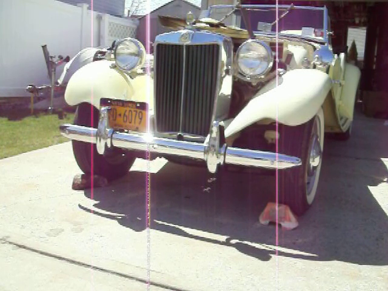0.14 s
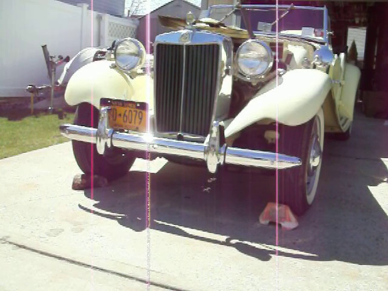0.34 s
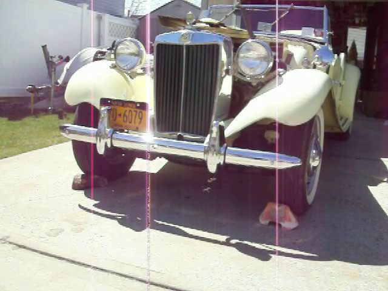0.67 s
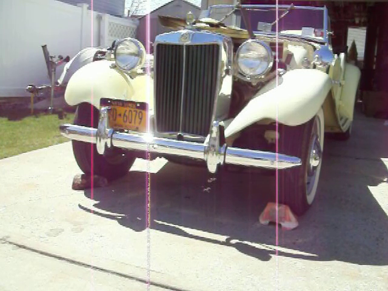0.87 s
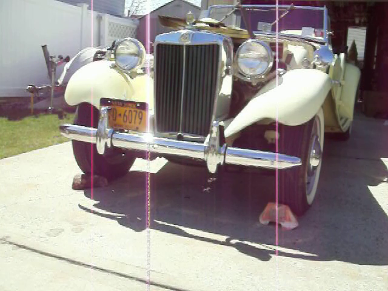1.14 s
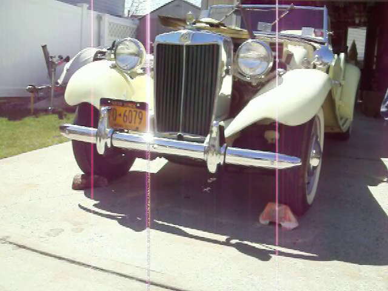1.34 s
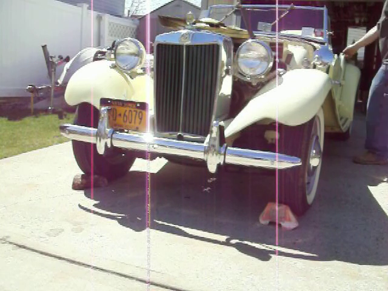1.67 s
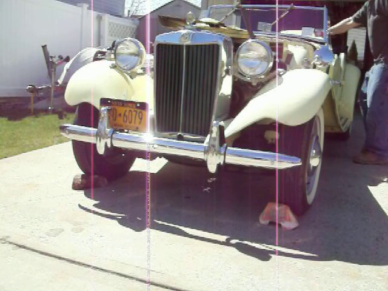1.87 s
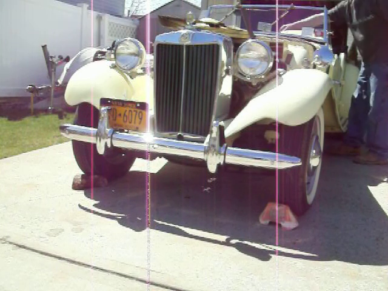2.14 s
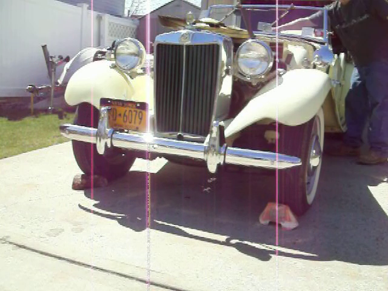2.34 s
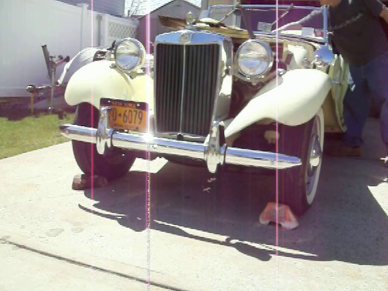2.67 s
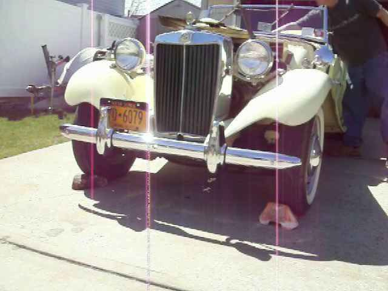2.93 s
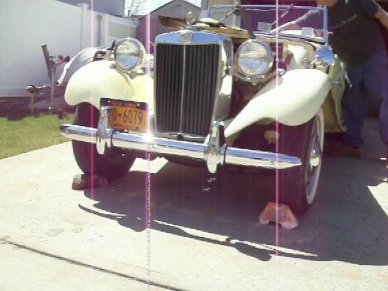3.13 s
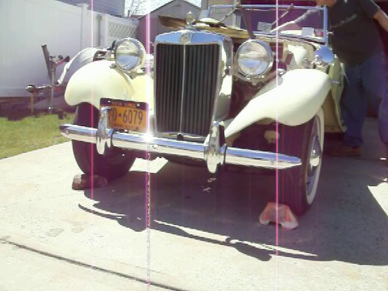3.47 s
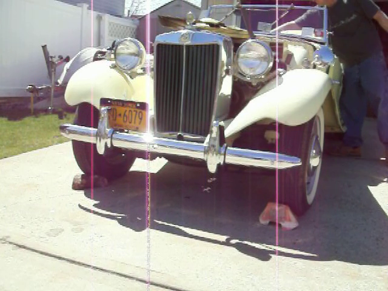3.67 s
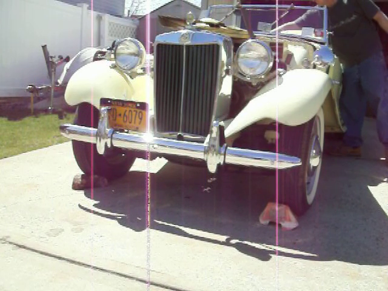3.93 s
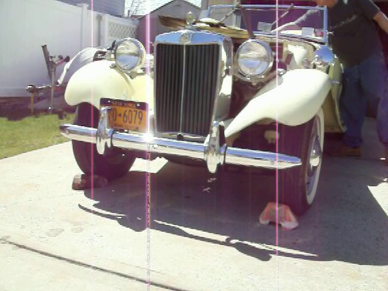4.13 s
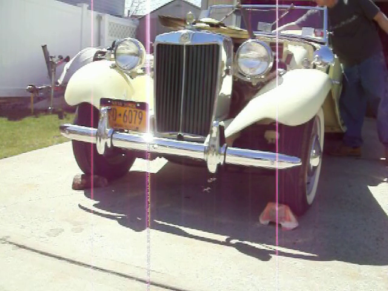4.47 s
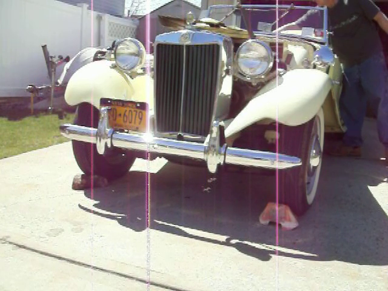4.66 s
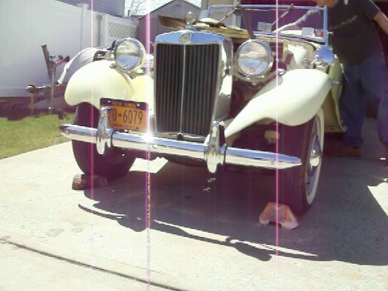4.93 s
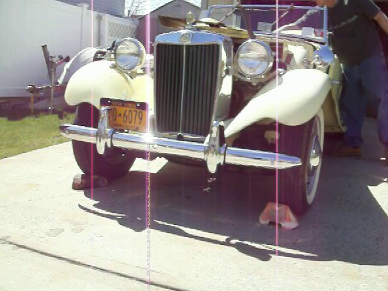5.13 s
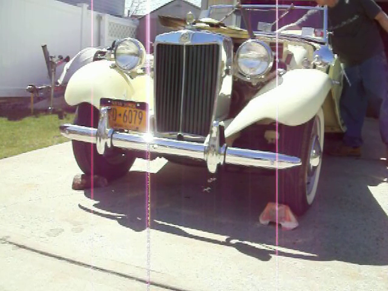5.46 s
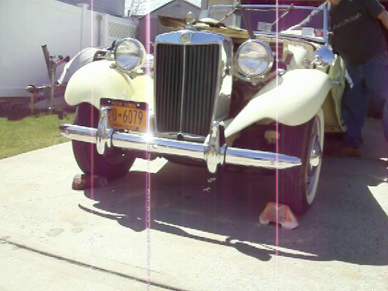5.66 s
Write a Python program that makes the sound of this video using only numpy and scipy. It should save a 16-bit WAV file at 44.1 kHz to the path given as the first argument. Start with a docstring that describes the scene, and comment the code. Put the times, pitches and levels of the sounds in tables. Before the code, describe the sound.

An old car engine idles with a rattly throb, then shuts off and shudders to rest as wind buffets the microphone.

```python
"""On a garden driveway, an old four-cylinder roadster idles, is switched off and runs down to rest.
The engine is a periodic source driving resonators: firings thud in the exhaust, tappets and timing
chain clatter under the cover, the block hums and knocks, and the slowing engine shakes the body.
Turbulent wind buffets a small camera's microphone and far birds whistle. One sharp click is heard
during the idle, and a soft swish after the engine stops."""
import sys
import numpy as np
from scipy import signal
from scipy.fft import rfft, irfft
from scipy.io import wavfile
from scipy.ndimage import uniform_filter1d

SR = 44100
rng = np.random.default_rng(int(sys.argv[2]) if len(sys.argv) > 2 else 0)


def int16_out(signal):
    """Quantize to a 16-bit WAV file."""
    q = np.round(np.clip(np.atleast_2d(signal).T, -1, 1) * 32767)
    wavfile.write(sys.argv[1], SR, q.astype(np.int16))


N = 255780
TIME = np.arange(N) / SR
IDLE_HZ = 41.2  # firing rate; a beat is one firing interval, four beats are one camshaft turn


def amp(db):
    """Amplitude ratio of a level in decibels."""
    return 10 ** (np.asarray(db) / 20)


def unit(x):
    """Normalisation to rms 1."""
    return x / np.sqrt(np.mean(x ** 2))


def idle_unit(x):
    """Normalisation to rms 1 over the first two seconds, while the engine idles."""
    return x / np.sqrt(np.mean(x[:2 * SR] ** 2))


def curve(rows):
    """Linear interpolation of (time_s, value) rows."""
    return np.interp(TIME, *np.transpose(rows))


def bell(x, middle, half_width):
    """Gaussian hump of height 1."""
    return np.exp(-((x - middle) / half_width) ** 2)


def noise():
    """Gaussian white noise."""
    return rng.standard_normal(N)


def walk(rate_hz):
    """Smooth random modulation of rms 1."""
    size = int(SR / rate_hz)
    steps = np.repeat(rng.standard_normal(N // size + 1), size)
    return unit(uniform_filter1d(steps, size)[:N])


def excite(x, response):
    """Convolution: a linear body answers each blow with its impulse response."""
    return signal.oaconvolve(x, response)[:N]


def colour(x, outline, size=16384):
    """Minimum-phase filter with a (frequency_hz, gain_db) outline, made by folding the cepstrum."""
    hz, db = np.transpose(outline)
    bins_hz = np.arange(size // 2 + 1) * SR / size
    gain_db = np.interp(np.log(bins_hz + 1), np.log(hz), db)
    cepstrum = irfft(np.log(amp(gain_db)))
    cepstrum[1:size // 2] *= 2
    cepstrum[size // 2 + 1:] = 0
    return excite(x, irfft(np.exp(rfft(cepstrum))))


def cut(x, hz, kind, order=2):
    """Maximally flat high-pass or low-pass filter."""
    return signal.sosfilt(signal.butter(order, hz, kind, fs=SR, output="sos"), x)


def burst(t60_s):
    """Dense modes merge into exponentially decaying noise, here of energy 1."""
    t = TIME[:SR // 5]
    tail = rng.standard_normal(len(t)) * np.exp(-np.log(1000) * t / t60_s)
    return tail / np.sqrt(np.sum(tail ** 2))


def ring(modes):
    """Free vibration: a sum of damped (pitch_hz, t60_s, level_db) modes."""
    t = TIME[:SR // 5]
    return sum(amp(db) * np.sin(2 * np.pi * hz * t) * np.exp(-np.log(1000) * t / t60_s)
               for hz, t60_s, db in modes)


def strikes(beats, place, scatter_db, jitter_beats):
    """Quasi-periodic impulses: one blow per camshaft turn, `place` beats into it."""
    turns = np.arange(0, beats[-1], 4)
    chance = rng.standard_normal((len(turns), 2))
    samples = np.searchsorted(beats, turns + place + jitter_beats * chance[:, 0])
    return np.bincount(samples, amp(scatter_db * chance[:, 1]), N + 1)[:N]


def placed(sound, start_s, peak_db):
    """A transient, delayed and scaled to a peak level."""
    shape = sound / np.abs(sound).max()
    return amp(peak_db) * np.interp(TIME - start_s, TIME[:len(sound)], shape, left=0, right=0)


# spectrum of the outdoor background: frequency_hz, gain_db
GARDEN_SPECTRUM = [(150, -39), (250, -4), (463, -7), (965, -4), (1110, -6.5), (1210, -9), (1610, -12),
                   (2420, -14.5), (2860, -14.5), (4590, -15.5), (5740, -29.5), (7460, -57), (12600, -120)]


def garden():
    """Ambient noise: a distant broadband wash whose level drifts slowly."""
    return unit(colour(noise(), GARDEN_SPECTRUM)) * amp(-43 + 2.3 * walk(2.524))


# pitch glides, by song name: length_s, start_hz, end_hz
BIRD_SONGS = {"up": (.135, 1712, 2100), "down": (0.11, 2112, 1400), "chip": (.042, 5060, 4180)}
# calls of far birds: start_s, song, level_db
BIRD_CALLS = [(3.714, "up", -49), (4.045, "up", -51), (4.235, "chip", -45.5), (4.41, "up", -50),
              (4.6, "chip", -44.5), (4.755, "down", -56), (5.115, "down", -61), (5.479, "down", -59)]


def birds():
    """Frequency sweeps: one bird slurs up or down, another chips; reflection off houses adds a tail."""
    calls = np.zeros(N)
    for start_s, song, db in BIRD_CALLS:
        length_s, start_hz, end_hz = BIRD_SONGS[song]
        progress = np.clip((TIME - start_s) / length_s, 0, 1)
        pitch_hz = start_hz + (end_hz - start_hz) * progress
        envelope = np.sqrt(2 * np.abs(np.sin(np.pi * progress)))
        calls += amp(db) * envelope * np.sin(2 * np.pi * np.cumsum(pitch_hz) / SR)
    return calls + amp(-6.5) * excite(calls, burst(t60_s=0.3))


def swish(middle_s=4.93, length_s=0.24):
    """Amplitude modulation: mid-range noise swells softly once, after the engine stops."""
    spectrum = [(120, -20), (400, 9.5), (750, 5), (1100, -7), (2200, -27), (5000, -38)]
    return amp(-41) * unit(colour(noise(), spectrum)) * bell(TIME, middle_s, length_s / 2)


def click(time_s=2.5481):
    """A brief pulse has a broad spectrum: two close spikes make one very bright click."""
    ms = (TIME - time_s) * 1000
    spikes = sum(np.exp(-np.abs(ms - lag_ms) / 0.05) for lag_ms in (0, 0.37))
    return 0.85 * bell(ms, 0.11, 0.65) - 2.1 * cut(spikes, 7700, "lowpass", order=1)


def eddy(seconds, half_width_ms):
    """A vortex has a low-pressure core: a dip at the microphone, with a gentle rise on either side."""
    u = seconds * 1000 / half_width_ms
    return 0.6 / (1 + (u / 2.5) ** 2) - 1.5 / (1 + u ** 2)


# spectrum of the wind's rumble: frequency_hz, gain_db
RUMBLE_SPECTRUM = [(12, -13), (24, 5), (45, -3.5), (70, -2.5), (110, -7), (180, -14), (300, -33),
                   (800, -74.5)]
# a breeze that wavers, then dies away: time_s, rumble_db
BREEZE_LEVELS = [(0, -18.5), (1.0, -18), (1.8, -22), (2.7, -17.5), (3.7, -25.5), (4.6, -25.5), (5.25, -28),
                 (5.8, -32)]
# gusts on top of it: middle_s, length_s, rumble_db, rustle_db
WIND_GUSTS = [(2.071, 0.15, -14.5, -32.5), (2.307, 0.23, -11, -23), (2.463, 0.029, -34, -25.5),
              (2.559, 0.052, -9.5, -45), (3.026, 0.18, -15.5, -53.5), (4.065, 0.2, -21, -48),
              (4.347, 0.23, -19.5, -34.5), (4.784, 0.11, -23, -40), (5.044, 0.14, -28, -50),
              (5.37, .08, -28, -52), (5.577, 0.18, -27.5, -60)]


def wind(full_wind_db=-23, calm_hz=70.6, eddies_per_s=35):
    """Turbulent pressure rumbles; gusts swell it, rustle, shed eddies and pull on the diaphragm."""
    gust = sum(amp(db) * bell(TIME, s, length / 2) for s, length, db, _ in WIND_GUSTS)
    rustling = sum(amp(db) * bell(TIME, s, length / 2) for s, length, _, db in WIND_GUSTS)
    strength = np.hypot(amp(curve(BREEZE_LEVELS)), gust)
    full, calm = (unit(colour(noise() * amp(1.3 * walk(30)), RUMBLE_SPECTRUM)) for _ in range(2))
    share = np.minimum(strength / amp(full_wind_db), 1)  # weak wind keeps only its deepest rumble
    rumble = strength * (share * full + np.sqrt(1 - share ** 2) * cut(calm, calm_hz, "lowpass"))
    rustle_spectrum = [(90, -18.5), (250, 3.5), (500, 4), (950, -13), (1600, -25.5), (4000, -49.5)]
    rustle = unit(colour(noise() * amp(3.2 * walk(70)), rustle_spectrum))
    shedding = (rng.random(N) < eddies_per_s / SR) * amp(-1.5 + 1.5 * noise()) * gust
    small_eddy = eddy(np.arange(-SR // 20, SR // 20) / SR, half_width_ms=1.3)
    eddies = signal.oaconvolve(shedding, small_eddy, "same")
    suction = amp(18.5) * gust ** 2
    return rumble + rustle * rustling + eddies - suction


# big eddies: middle_s, level_db, half_width_ms
BIG_EDDIES = [(1.116, -7, 1.6), (2.024, -9.5, 0.44), (2.225, 3.5, 1.27), (2.284, 4.5, 0.62), (2.317, 7, .9),
              (2.347, -0.5, 0.65), (2.387, 6, 1.5), (2.464, 4.5, 1), (2.509, 6, 2.1), (2.872, -5, 0.73),
              (4.001, -6.5, 1.7), (4.046, -6.5, 1.75), (4.322, -5, 1.6), (4.358, -6, 4.3), (4.768, -9, 2.9),
              (4.804, -5, 1.2), (4.823, -7.5, 1.4), (5.016, -11, 2.6), (5.156, -13, 2), (5.408, -10, 2.6)]


def wind_thumps():
    """Pressure pulses: single big vortices thump the microphone as they pass."""
    return sum(amp(db) * eddy(TIME - s, ms) for s, db, ms in BIG_EDDIES)


# tones of block and dynamo: firing_multiple, level_db
SHAFT_ORDERS = [(4.25, -27), (5.5, -40.5), (7.5, -45), (8, -37.5), (9.5, -44), (10, -46), (12.5, -45.5),
                (14.85, -49), (15, -43), (16, -57), (20, -52.5)]


def hum(beats, pace):
    """Rotational orders: wavering tones follow the shaft speed and fade quickly as it falls."""
    angle = beats + 0.0079 * walk(12)
    tones = sum(amp(db + 2.7 * walk(9)) * np.sin(2 * np.pi * (k * angle + rng.random()))
                for k, db in SHAFT_ORDERS)
    return np.sqrt(2) * tones * np.minimum(pace, 1) ** 6


# response of the engine block: frequency_hz, gain_db
BLOCK_RESPONSE = [(150, -6.5), (260, -10), (450, -1), (560, -1), (720, 3), (880, -1.5), (1050, 0),
                  (1170, -5.5), (1400, -6), (1700, -10.5), (3000, -44)]


def block(beats, pace):
    """Impact and friction: pistons knock at each stroke's end; bearings and belt rub on as they slow."""
    slaps = sum(excite(strikes(beats, k / 2, scatter_db=4.5, jitter_beats=0.004), burst(t60_s=0.05))
                for k in range(8))
    knocks = amp(-5) * idle_unit(colour(slaps, BLOCK_RESPONSE))
    rub = amp(-1 - 2.5 * pace) * unit(colour(noise(), BLOCK_RESPONSE))
    return (knocks + rub) * amp(-31.5) * pace ** 0.61


# knocks as the crankshaft rocks to rest: start_s, peak_db
SLACK_KNOCKS = [(4.115, -26), (4.19, -22.5), (4.335, -24), (4.391, -23.5), (4.449, -25), (4.477, -30),
                (4.52, -24)]


def last_knocks():
    """Backlash: slack in the drive is taken up with dull knocks on the block."""
    return sum(placed(colour(burst(t60_s=0.16), BLOCK_RESPONSE), s, db) for s, db in SLACK_KNOCKS)


# tappet blows within one camshaft turn: place_beats, relative_db
TAPPET_BLOWS = [(.58, -6.5), (.8, 6), (0.982, -0.5), (1.8, 0.5), (1.972, -7), (2.62, 1.5), (2.8, -7),
                (3.022, -8.5), (3.7, 0), (3.86, -10)]
# response of the valve cover: frequency_hz, gain_db
COVER_RESPONSE = [(700, -18.5), (1300, -3.5), (1600, -12.5), (1980, -4.5), (2120, 0), (2750, 1), (3120, 0),
                  (3400, 4), (3750, -3), (4300, -1.5), (4750, -8), (5050, -5.5), (5500, -10), (6000, -35.5)]
# ringing parts of the valve gear: pitch_hz, t60_s, relative_db
GEAR_MODES = [(1307, 0.13, -3.5), (1788, 0.11, -6), (2553, 0.042, -3.5), (2650, 0.064, -1),
              (3010, 0.08, -3), (3150, 0.017, -5.5), (3477, 0.05, 0), (4790, 0.12, -7.5)]


def valve_gear(beats, pace):
    """Modal excitation: tappets strike under the cover; the chain's sizzle keeps the parts ringing."""
    blows = [amp(db) * strikes(beats, place, scatter_db=1.4, jitter_beats=0.007)
             for place, db in TAPPET_BLOWS]
    impacts = sum(excite(blow, burst(t60_s=0.034)) for blow in blows)
    clicks = idle_unit(colour(impacts, COVER_RESPONSE))
    rings = idle_unit(excite(sum(blows), ring(GEAR_MODES)))
    # the timing chain tightens before each firing
    tension_db = 1.4 * np.cos(2 * np.pi * (beats - 0.87)) + 1.7 * walk(150)
    chain = idle_unit(colour(noise() * amp(tension_db), COVER_RESPONSE))
    chain_ring = idle_unit(excite(noise(), ring(GEAR_MODES)))
    # slower cams set the valves down more gently, and the chain takes over
    tappets = (amp(-5.5) * clicks + amp(-9) * rings) * pace ** 0.3
    clatter = tappets + amp(-2.3 * pace) * chain + amp(-11.5) * chain_ring
    return clatter * amp(-28.5) * pace ** 0.98


# valve closings as the engine coasts: start_s, peak_db, favoured_hz
VALVE_CLINKS = [(3.679, -26, 1390), (3.775, -29, 3300), (3.882, -25.5, 1380), (4.169, -27, 1390),
                (4.41, -29.5, 3800), (4.468, -30, 3000), (4.548, -29.5, 3800), (4.625, -37, 3600),
                (4.693, -32.5, 3500)]


def clinks():
    """Selective excitation: each last valve snaps shut and favours the modes near one pitch."""
    out = np.zeros(N)
    for start_s, peak_db, favoured_hz in VALVE_CLINKS:
        modes = [(hz, t60_s / 2, db - 18 * abs(np.log2(hz / favoured_hz)))
                 for hz, t60_s, db in GEAR_MODES]
        out += placed(signal.fftconvolve(ring(modes), burst(t60_s=0.096)), start_s, peak_db)
    return out


# mode of a body panel: pitch_hz, t60_s, relative_db
PANEL_MODES = [(225.7, 0.6, 0)]


def car_body(puffs, beats, firing_hz, shake_at_hz=28.5, boom_at_hz=32.5):
    """Resonance: the body shakes and a panel booms as the firing rate falls through their ranges."""
    shake = np.sqrt(2) * (np.sin(4 * np.pi * beats) + amp(-4) * np.sin(2 * np.pi * beats))
    shake_gain = amp(-21) * bell(firing_hz, shake_at_hz, half_width=6)
    boom = unit(excite(puffs, ring(PANEL_MODES)))
    boom_gain = amp(-43) * firing_hz / IDLE_HZ + amp(-32) * bell(firing_hz, boom_at_hz, half_width=7)
    return shake * shake_gain + boom * boom_gain


# the four cylinders in firing order: relative_db, lateness_beats
CYLINDER_PULSES = [(-1.5, 0.014), (7, 0.016), (1.5, -0.015), (-6.5, 0.031)]


def cylinder_puffs(beats):
    """Pulse train: four unequal cylinders make a lopsided pattern that recurs each camshaft turn."""
    return sum(amp(db) * strikes(beats, k + late, scatter_db=1.4, jitter_beats=0.014)
               for k, (db, late) in enumerate(CYLINDER_PULSES))


# response of exhaust pipe and silencer: frequency_hz, gain_db
PIPE_RESPONSE = [(22, -20.5), (45, -5.5), (75, -7.5), (110, 7.5), (170, -2.5), (226, -2), (250, -5.5),
                 (330, -9), (420, -19), (800, -53.5)]
# steady swing of gas in the pipe: firing_multiple, relative_db
PIPE_HARMONICS = [(1, -10.5), (2, -7.5), (3, -2), (4, -8), (5, -12)]


def exhaust(puffs, beats, pace, key_off_s=2.89, burn_out_s=0.085, unfired_db=-5):
    """Forced oscillation: puffs drive the gas in the pipe, and weaken once the ignition is cut."""
    dispersion_rad = 1.2  # the pipe shifts each harmonic's phase by the square of its number
    throb = sum(amp(db + 1.3 * walk(14)) * np.cos(2 * np.pi * k * beats + dispersion_rad * k ** 2)
                for k, db in PIPE_HARMONICS)
    # without combustion the puffs lose their edge as the engine slows
    edge = amp(-13.5) * idle_unit(colour(puffs, PIPE_RESPONSE)) * pace ** 4
    unfired = np.clip((TIME - key_off_s) / burn_out_s, 0, 1)
    return (np.sqrt(2) * throb + edge) * amp(-17 + unfired_db * unfired) * pace ** 1.5


# engine speed, idling and then coasting to rest: time_s, firing_hz
FIRING_RATE = [(0, 40.6), (.5, 41.45), (1.25, 41.55), (2.0, 40.8), (2.97, 41.5), (3.1, 39.2), (3.3, 30.8),
               (3.7, 22.0), (4.35, 8.5), (4.58, 1.3), (4.75, 0)]


def scene():
    """Superposition: engine, wind and garden add at the microphone."""
    firing_hz = curve(FIRING_RATE)
    beats = np.cumsum(firing_hz) / SR
    pace = firing_hz / IDLE_HZ
    puffs = cylinder_puffs(beats)
    engine = exhaust(puffs, beats, pace) + car_body(puffs, beats, firing_hz)
    engine += hum(beats, pace) + valve_gear(beats, pace) + block(beats, pace)
    engine += clinks() + last_knocks()
    return (engine + wind() + wind_thumps() + swish() + garden() + birds())[None]


def gain_control(x, ceiling_db, window=882):
    """Limiting: whenever the short-term rms passes the ceiling, the whole sound ducks."""
    level = np.sqrt(uniform_filter1d(x ** 2, size=window) + 1e-9)
    gain = np.minimum(amp(ceiling_db) / level, 1)
    return x * uniform_filter1d(gain, size=window // 2)


def record(dry, band_hz=5900, top_hz=16500):
    """Saturation and band limiting: the camera ducks, rounds peaks and cuts treble; a click breaks in."""
    held = cut(gain_control(dry, ceiling_db=-10), 24, "highpass")
    rounded = held / (1 + (held / 0.66) ** 6) ** (1 / 6)
    narrow = signal.sosfilt(signal.ellip(8, 0.2, 80, band_hz, fs=SR, output="sos"), rounded)
    clipped = np.clip(narrow + click(), -0.73, 0.73)
    return signal.sosfilt(signal.ellip(8, 0.2, 70, top_hz, fs=SR, output="sos"), clipped)


dry = scene()
out = record(dry)
int16_out(out)
```